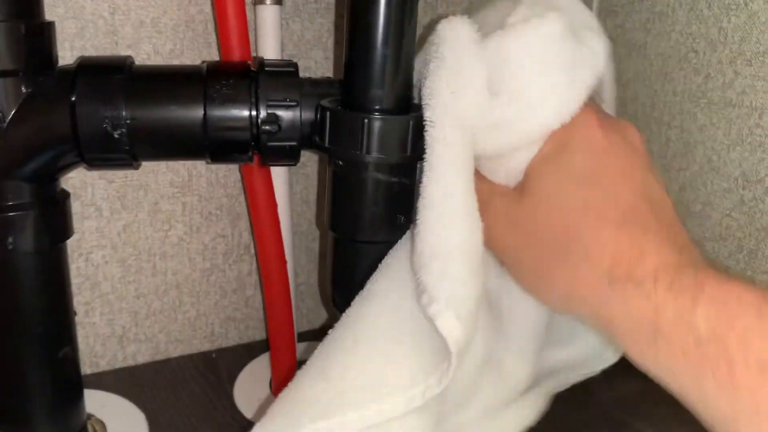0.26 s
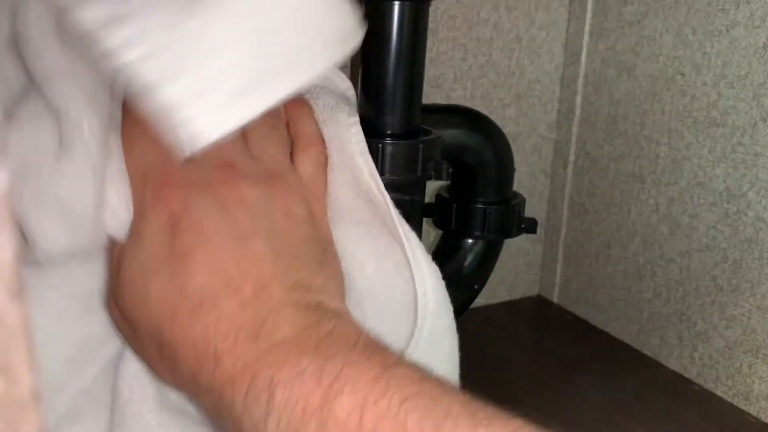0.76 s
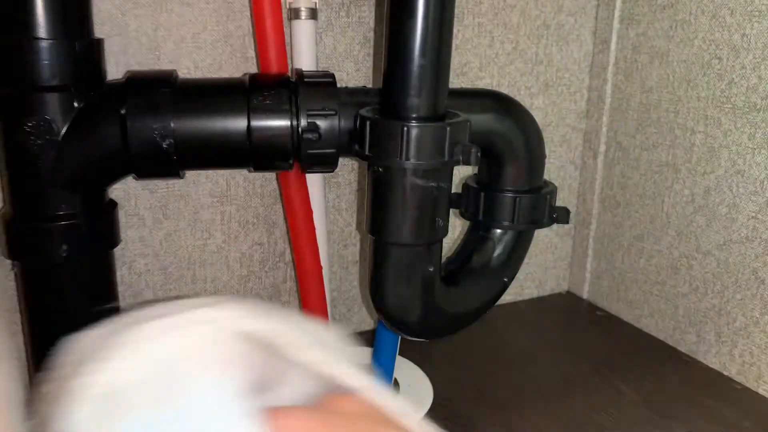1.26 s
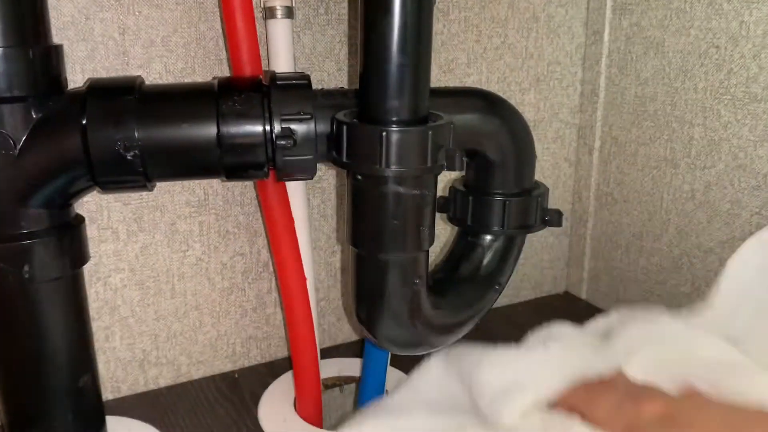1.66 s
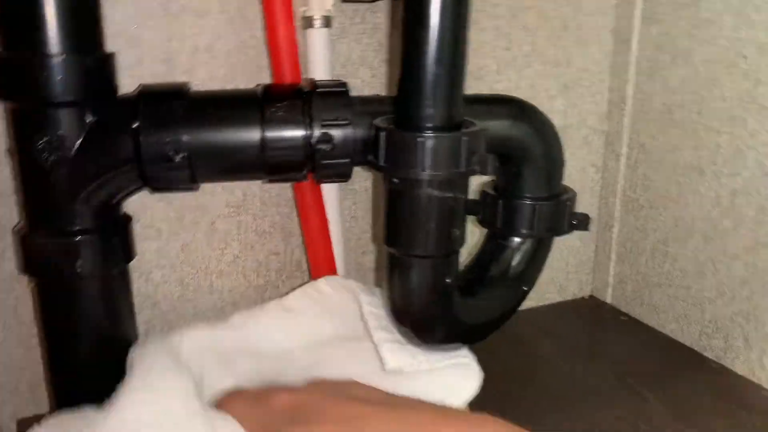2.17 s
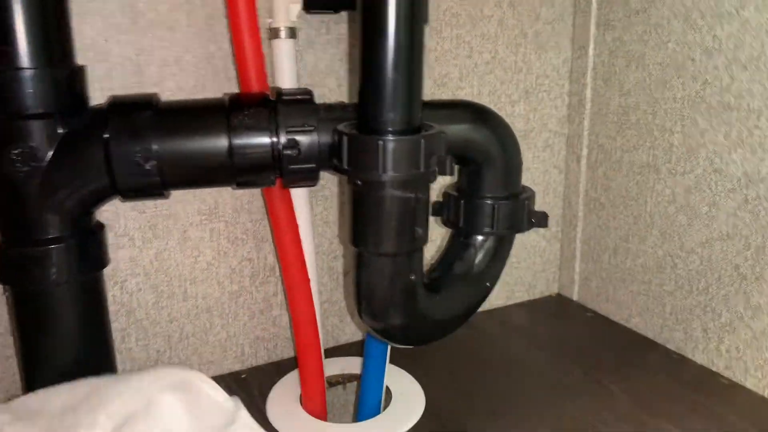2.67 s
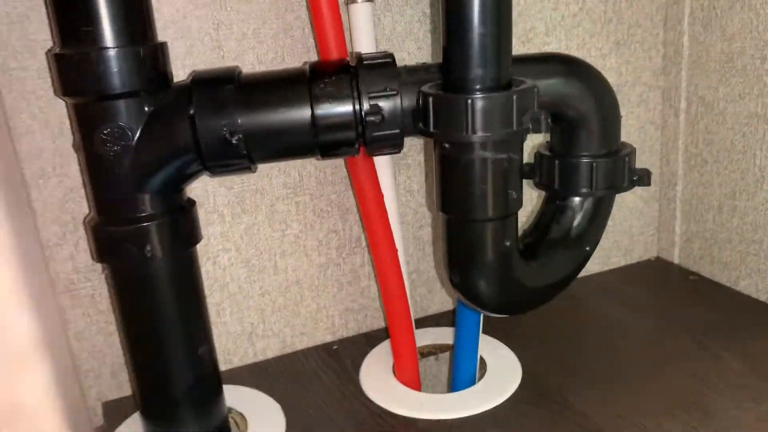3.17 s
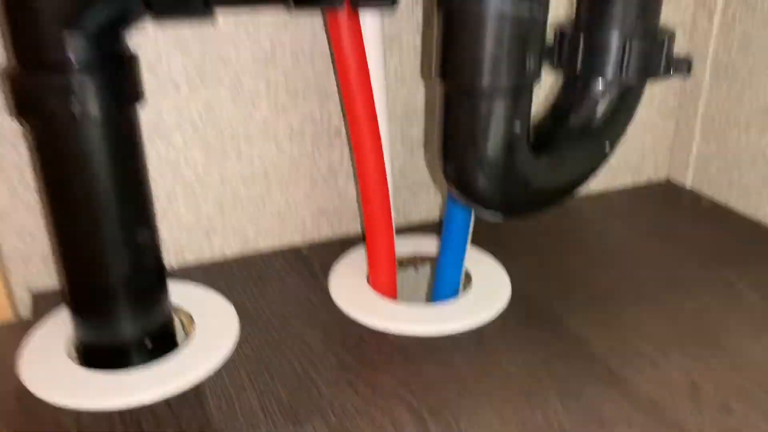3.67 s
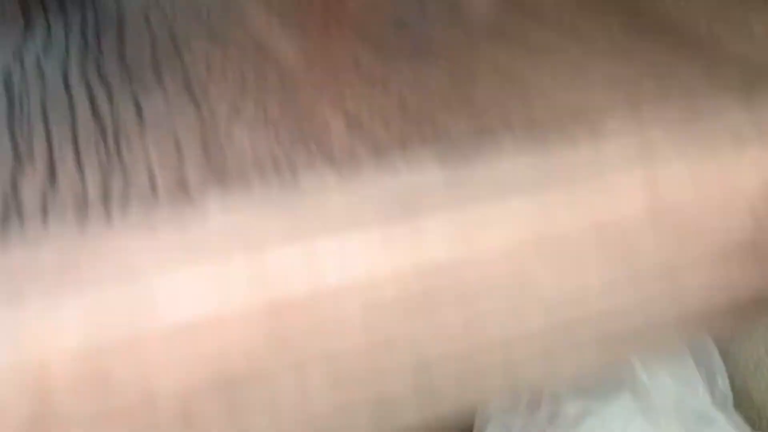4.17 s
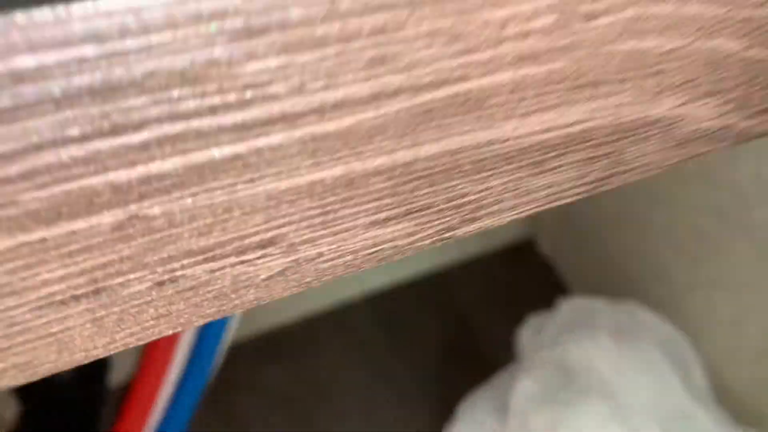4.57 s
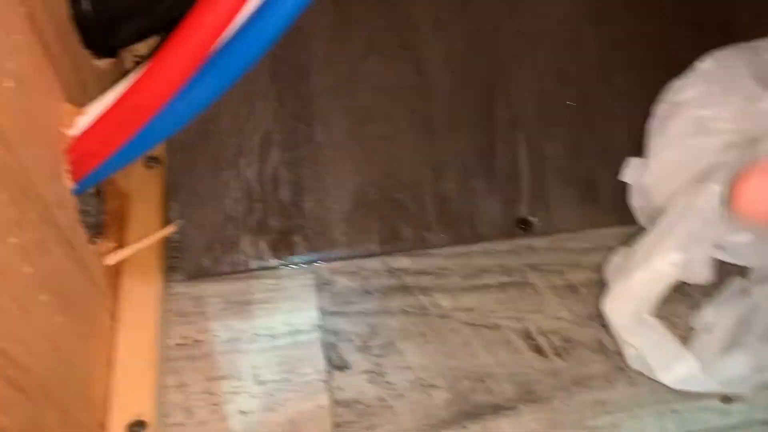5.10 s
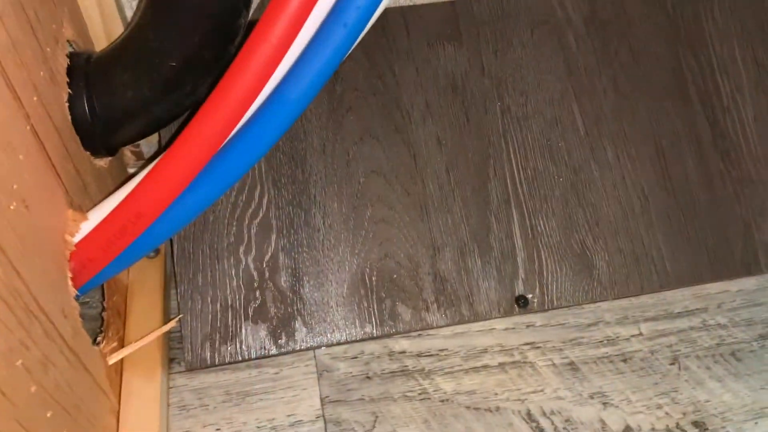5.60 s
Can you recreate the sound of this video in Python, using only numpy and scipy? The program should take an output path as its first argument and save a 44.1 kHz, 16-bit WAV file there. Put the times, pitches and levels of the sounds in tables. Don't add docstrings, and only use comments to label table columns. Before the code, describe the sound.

Inside a small wooden under-sink cabinet, a towel drags in short soft strokes while the hand bumps panels and plastic pipes with dull, hollow knocks. Strokes brighten toward three seconds. Near four seconds the handheld stereo microphone is swung round, with a graze, a loose clink and a very loud pop. It ends with close, fast, hissy wiping and small taps.

```python
import sys
import numpy as np
from scipy import signal
from scipy.fft import rfft, irfft, next_fast_len
from scipy.io import wavfile
from scipy.ndimage import uniform_filter1d

SR = 44100
rng = np.random.default_rng(int(sys.argv[2]) if len(sys.argv) > 2 else 0)


def undo_db(level):
    steps = np.asarray(level, float) / 20
    return 10 ** steps


def waveform_to_disk(signal):
    frames = np.transpose(np.atleast_2d(signal))
    scaled = np.clip(frames, -1, 1) * 32767
    samples = np.round(scaled).astype(np.int16)
    wavfile.write(sys.argv[1], SR, samples)


N = 257544
PADDED = next_fast_len(N + SR // 4)

# (start [s], length [s], speed as hiss level [dB], grip as scrape level [dB])
STROKES = [(-0.04, 0.19, -74.5, -70.5), (0.13, 0.21, -68.5, -68), (0.428, 0.26, -74, -71),
           (0.84, 0.49, -76.5, -75.5), (1.14, 0.18, -68.5, -66.5), (1.326, 0.28, -71, -73),
           (1.658, 0.16, -60.5, -62.5), (1.834, 0.24, -60.5, -63.5), (2.158, 0.2, -65, -60.5),
           (2.404, 0.21, -62.5, -61.5), (2.686, 0.15, -63, -63), (2.843, 0.25, -68, -68.5),
           (3.205, 0.13, -55.5, -59), (3.356, 0.15, -64, -68), (3.451, 0.17, -58, -64),
           (3.645, 0.044, -62, -73), (3.687, 0.053, -60.5, -69), (3.771, 0.076, -64, -87),
           (3.927, 0.024, -59.5, -84), (3.856, 0.092, -54, -80), (4.002, 0.11, -59, -96),
           (4.149, 0.13, -59.5, -75), (4.293, 0.19, -55.5, -64), (4.537, 0.11, -61.5, -65.5),
           (4.619, 0.12, -59, -63), (4.767, 0.094, -56, -57), (4.875, 0.16, -70, -76),
           (5.064, 0.091, -73.5, -66), (5.168, 0.071, -37, -62), (5.235, 0.073, -40.5, -54),
           (5.284, 0.051, -42.5, -51), (5.34, 0.089, -42.5, -56), (5.463, 0.22, -46.5, -55.5),
           (5.562, 0.081, -46.5, -47), (5.692, 0.087, -50.5, -55)]
ATTACK_S, SAG_DB_PER_S, RELEASE_DB_PER_S = 0.035, 9.5, 245
REST_HISS_DB, REST_SCRAPE_DB, REST_SWISH_DB = -83.5, -74, -86.5
# (time [s], level [dB])
LEAN = [(0.0, -55), (0.45, -54.5), (0.93, -57), (1.25, -54.5), (2.0, -55), (2.15, -55), (3.17, -59),
        (3.46, -55.5), (3.67, -57.5), (3.94, -63.5), (4.6, -56), (4.75, -52.5), (5.11, -56.5),
        (5.53, -54.5), (5.6, -46.5), (5.84, -50)]
# (start [s], length [s], level [dB])
HEM = [
    (0.03, 0.29, -75),
    (1.2, 0.17, -71),
    (1.36, 0.24, -69.5),
    (1.68, 0.088, -67),
    (2.83, .17, -68.5),
    (3.5, 0.12, -66),
    (4.35, 0.095, -67),
    (4.62, 0.21, -69.5),
    (5.33, 0.3, -55),
]
# (frequency [Hz], density [dB per Hz])
HISS = [(1500, -23), (3000, -1), (4500, 1), (7000, 3), (10000, 5), (14000, 3), (16500, 3.5)]
# (frequency [Hz], share [0-1])
LIKENESS = [(300, 0.97), (700, 0.85), (1100, 0.35), (1800, 0.7), (4000, 0.03), (12000, 0.04)]
ECHO_DB, WANDER_S = -4, 0.000301
FLECKS_PER_S, FLECK_DB, FLECK_WIDTH_HZ = 300, -8.5, 53

# (frequency [Hz], width [Hz], level [dB])
BOOM = [(86.3, 26.4, 0), (124, 24.3, 5), (159.2, 28.3, 1.5), (200.4, 61.5, 1), (259, 165, -4)]
PANELS = [(334, 59, 3), (387, 100, 2.5), (450, 310, -18.5), (536.3, 40, -3.5)]
THIN_PANELS = [(638.6, 59, -0.5), (707.4, 93, -1), (819, 53, -7), (997, 83, -13)]
PIPE = [(1080, 180, -1.5), (1245, 47, -5.5), (1420, 75, -1), (1589, 40, -8.5)]
CRACK_MODES = [(1985, 470, 10), (2150, 200, 10), (2476, 410, 10), (2570, 25, -26), (2975, 85, 5.5),
               (3280, 300, -0.5), (3700, 620, 9)]
SWISH = [(4170, 140, 2.1), (4630, 380, 12)]
FRAME = [(790, 77, 6), (1000, 74, 3.5)]
BOOM_DB, PANEL_DB, THIN_DB, PIPE_DB = 7, -62.5, -65, -70
PANEL_PER_LEAN, PANEL_PER_GRIP = 0.037, 0.77
THIN_PER_LEAN, THIN_PER_GRIP, PIPE_PER_GRIP = 0.088, 0.64, 1
NEAR_PANEL_DB, NEAR_THIN_DB = -6, -1.5
RUMBLE_DB = -69.5

# (time [s], peak [dB], ring [Hz], crack [dB], t60 [s])
TRAP_KNOCKS = [(0.113, -36.5, 450, -67, 0.03), (0.51, -31.5, 450, -41, 0.046),
               (1.076, -31, 387, -32.5, 0.073), (1.25, -48.5, 670, -47.5, 0.071),
               (1.644, -30, 486, -40, 0.055), (1.903, -44.5, 478, -46, 0.46), (1.927, -49, 630, -45, 0.03),
               (1.988, -43, 610, -44.5, 0.1), (2.056, -49, 615, -43, 0.079),
               (2.212, -37, 434, -37.5, 0.052), (2.466, -43.5, 487, -47.5, 0.081),
               (3.934, -35, 844, -37.5, 0.062), (3.954, -50, 325, -35.5, 0.014),
               (4.916, -41, 795, -39.5, 0.058), (5.181, -44.5, 996, -40.5, 0.3),
               (5.567, -41, 1030, -52, 0.08), (5.625, -35.5, 816, -42.5, 0.088),
               (5.687, -38.5, 1000, -38, 0.17)]
DRAIN_KNOCKS = [(1.034, -37, 420, -55, 0.066), (1.35, -50.5, 655, -51.5, 0.032),
                (2.915, -42.5, 377, -55.5, 0.072), (3.274, -34.5, 500, -35, 0.05),
                (3.325, -26, 670, -34, 0.076), (3.505, -43.5, 378, -49.5, 0.12),
                (3.563, -36.5, 730, -37.5, 0.1), (3.613, -41, 378, -45.5, 0.061),
                (3.894, -33.5, 660, -48, 0.048), (4.249, -44.5, 830, -52, 0.043),
                (4.368, -29, 703, -35, 0.039), (4.577, -41.5, 940, -44, 0.037),
                (4.674, -46.5, 864, -51, 0.083), (5.223, -60, 820, -38.5, 0.13)]
RIM_KNOCKS = [
    (0.582, -49, 604, -57.5, 0.075),
    (1.601, -42, 450, -49, 0.065),
    (1.144, -43, 700, -60, 0.1),
]
# (time [s], peak [dB], ring [Hz], t60 [s])
PADDED_KNOCKS = [(0.041, -43.5, 530, 0.052), (0.087, -41, 387, 0.03), (0.601, -47, 577, 0.37),
                 (0.749, -47.5, 378, 0.086), (1.205, -46, 450, 0.34), (1.416, -47, 388, 0.067),
                 (2.319, -37, 544, 0.082), (2.755, -48, 625, 0.11), (3.236, -48.5, 526, 0.1),
                 (4.297, -45, 660, 0.053), (4.62, -47, 873, 0.061), (4.842, -52, 1070, 0.067),
                 (5.411, -42.5, 820, 0.057), (5.739, -49, 1050, 0.091), (5.78, -29.5, 520, 0.04)]
TRAP_HZ, DRAIN_HZ, RIM_HZ = 1333, 1604, 2350
MUFFLED_DB, LEAD_IN_DB = -13, -18.5
OFF_PITCH_DB_PER_OCTAVE = 4.5
# (time [s], peak [dB], frequency [Hz], t60 [s])
BUMPS = [(0.045, -41.5, 168, 0.093), (0.517, -43, 124, 0.017), (0.655, -55, 143, 0.13),
         (1.029, -42.5, 152, 0.11), (1.074, -34.5, 184.5, 0.18), (1.207, -44, 162, 0.087),
         (1.644, -36, 141, 0.018), (2.056, -39, 180, 0.034), (2.918, -46, 135, 0.16),
         (3.279, -30, 190, 0.022), (3.326, -38.5, 170, 0.11), (3.566, -31, 244, 0.039),
         (4.371, -33.5, 172, 0.025), (4.712, -44.5, 101, 0.11), (4.76, -50, 164.5, 0.15),
         (5.415, -38, 124, 0.033), (5.552, -50, 115.6, 0.28), (5.785, -46, 200, 0.06)]
# (start [s], length [s], peak [dB], frequency [Hz])
CATCHES = [(0.102, 0.023, -47, 6400), (1.241, 0.042, -48, 2600), (1.325, .05, -54, 2070),
           (1.329, 0.062, -57.5, 6200), (1.34, 0.028, -57, 4770), (1.354, 0.018, -48, 1510),
           (2.315, 0.011, -46.5, 6800), (2.477, 0.044, -50.5, 2200), (2.694, .03, -54, 1300),
           (2.748, 0.063, -57, 2000), (2.801, 0.048, -50.5, 1310), (2.908, 0.021, -46, 1250),
           (0.105, .012, -57, 2100), (3.475, .015, -54, 10500), (3.49, .015, -54, 11500),
           (3.522, 0.021, -44, 1550), (3.529, 0.018, -47, 2900), (3.592, 0.042, -43, 3920),
           (3.607, 0.025, -47, 5000), (3.682, .022, -49, 3900), (3.697, .015, -50, 10500),
           (3.755, 0.014, -45, 12200), (3.759, 0.031, -52, 365), (3.794, .02, -56, 5200),
           (4.2, .02, -49, 7800), (4.65, .02, -56, 3500), (4.676, 0.032, -48.5, 1560),
           (4.708, 0.016, -48, 4300), (4.759, 0.013, -55, 3200), (4.79, 0.033, -50, 3900),
           (4.859, 0.013, -50, 800), (4.902, 0.011, -49, 3930), (5.201, 0.047, -38, 1370),
           (5.335, 0.057, -42.5, 795), (5.588, 0.067, -44, 1920), (5.645, .05, -46, 1890),
           (5.709, 0.014, -39, 1050), (5.75, 0.041, -42, 1000), (1.075, 0.017, -46.5, 4100),
           (2.206, 0.013, -42.5, 3880), (2.2, .015, -51, 5200), (3.263, 0.023, -50, 2750),
           (3.317, 0.02, -46, 3630), (4.395, .055, -50, 165), (4.895, 0.027, -41, 860),
           (4.398, 0.025, -45.5, 796), (5.37, .05, -43, 8000), (1.015, .025, -55, 2600),
           (0.576, 0.011, -56, 2270),
    (1.599, 0.011, -50.5, 3960),
    (1.6, .01, -57, 3070),
    (1.642, 0.0073, -47, 4100),
    (3.943, 0.023, -28, 1237),
    (3.947, .008, -36, 4500),
    (1.241, .04, -63, 1630),
]
CATCH_WIDTH = 0.11
# (time [s], peak [dB], t60 [s])
TICKS = [(0.1106, -46, 0.02), (0.474, -47, 0.026), (0.514, -42.5, 0.02), (1.075, -42.5, 0.019),
         (1.6427, -41, 0.016), (2.213, -42.5, 0.025), (2.3203, -47, 0.0086), (3.563, -38.5, 0.014),
         (3.605, -44, 0.068), (3.759, -41, 0.018), (4.575, -49, 0.017), (5.1787, -31.5, 0.028),
         (5.778, -36.5, 0.012)]
# (time [s], peak [dB], ring [Hz], t60 [s])
CLEAN_TAPS = [(0.575, -47, 490, 0.044), (0.599, -37.5, 513, 0.056), (0.618, -47, 649, 0.13),
              (0.636, -43.5, 516, 0.094), (0.649, -31, 145, 0.16), (0.75, -35, 390, 0.092),
              (1.028, -40, 470, 0.073), (1.0755, -30, 1404, 0.042), (1.076, -36, 2610, 0.04),
              (1.077, -41, 1910, 0.035), (1.081, -22.5, 400, 0.038), (1.08, -28.5, 617, 0.04),
              (1.087, -29.5, 647, 0.027), (1.105, -39.5, 600, 0.078), (1.602, -42.5, 2350, 0.032),
              (1.605, -39, 556, 0.036), (1.637, -24, 363, 0.082), (1.642, -35, 1310, 0.03),
              (1.647, -32.5, 586, 0.022), (2.211, -42, 1590, 0.021), (2.213, -31.5, 420, 0.1),
              (2.217, -37.5, 709, 0.059), (2.321, -31.5, 502, 0.034), (2.321, -34, 603, 0.12),
              (2.319, -47, 1255, 0.06), (2.321, -32.5, 400, .08), (2.212, -44.5, 2080, 0.047),
              (3.224, -42, 470, 0.044), (3.24, -38.5, 540, 0.058), (3.274, -32, 1480, 0.034),
              (3.276, -15.5, 490, 0.01), (3.282, -38, 533, 0.25), (3.278, -24, 337, 0.046),
              (3.331, -27.5, 392, .1), (3.327, -46, 2250, .045), (3.326, -22, 760, 0.009),
              (3.33, -22, 496, 0.045), (3.339, -32.5, 717, 0.034), (3.326, -38, 1610, 0.021),
              (4.367, -32.5, 1500, 0.064), (4.372, -22, 752, 0.038), (4.372, -38, 409, 0.12),
              (4.382, -26.5, 770, 0.024), (4.706, -32.5, 124, 0.084), (4.721, -31.5, 168, 0.095),
              (4.917, -31, 790, 0.042), (5.633, -32.5, 700, 0.043), (5.738, -33.5, 1037, 0.036),
              (5.781, -25, 505, 0.054),
              (0.511, -41, 1420, 0.047), (0.512, -42, 2120, 0.046), (1.602, -52, 1360, .03),
             (1.649, -26, 707, 0.013), (3.8895, -38, 1790, 0.12), (3.892, -40, 940, 0.12),
             (3.893, -30, 654, 0.043), (3.934, -31, 820, .04), (3.936, -37, 522, 0.069),
             (5.553, -30.5, 113.3, 0.19), (5.6296, -27.5, 960, 0.016), (5.45, -39.5, 123, .5),
             (5.781, -31.5, 237, 0.046)]
TAP_RISE_CYCLES = 0.39
# (start [s], length [s], level [dB])
DRAIN_RUBS = [
    (1.2, 0.56, -69),
    (2.85, 0.077, -59),
    (3.5, 0.12, -55),
    (3.56, 0.17, -63.5),
]
# (start [s], length [s], level [dB])
SCUFFS = [
    (4.6, .06, -64),
    (4.67, 0.11, -55),
    (4.8, 0.1, -50.5),
    (5.19, 0.065, -65),
    (5.57, 0.071, -48),
    (5.68, 0.12, -50),
    (5.79, 0.037, -61),
]
# (frequency [Hz], width [Hz], level [dB])
CLINK = [(2150, 240, -6), (2770, 220, -10), (3190, 260, -7), (5000, 510, -10), (5480, 77, -3)]
CLINK_S, CLINK_DB = 3.889, -31

# (frequency [Hz], left lead [rad], left-right [dB])
PORTS_BEFORE = [(40, 1.5, 0), (240, 3.0, 0), (370, 4.1, 0), (620, 5.9, 0), (760, 6.4, 0), (1100, 8.8, 0),
                (1450, 7.1, 0), (16000, 22, 0)]
PORTS_AFTER = [(40, 0.6, 15), (97, 0.23, -7), (267, 1.28, -6), (341, 3.88, -3), (670, 5.33, -2),
               (800, 7.4, -2), (1000, 7.4, -7.5), (1400, 3.86, 0.5), (2120, 9, -0.5), (17200, 21.3, -3)]
SWING_S = 3.885
POP_S, POP_LEFT_DB, POP_RIGHT_DB = 3.9612, 3.5, -2
DUCK_DB, RECOVER_S = -18, 0.061


def amp_one(x):
    return x / np.sqrt(np.mean(x ** 2) + 1e-20)


def top_one(x):
    return x / np.abs(x).max()


def add(out, s, sound):
    i = int(s * SR)
    out[:, i:i + sound.shape[-1]] += sound[..., :N - i]


def in_time(rows):
    s, *columns = np.transpose(rows)
    return [np.interp(np.arange(N) / SR, s, c) for c in columns]


def at_hz(points, hz):
    points_hz, values = np.transpose(points)
    return np.interp(np.log(hz), np.log(points_hz), values)


def drift(rate_hz):
    r = np.exp(-80 * np.pi * rate_hz / SR)
    slow = signal.lfilter([1], [1, -2 * r, r * r], rng.standard_normal(N // 40 + 2002))[2000:]
    return np.interp(np.arange(N) / 40, np.arange(len(slow)), amp_one(slow))


def resonate(x, hz, width_hz):
    r = np.exp(-np.pi * width_hz / SR)
    poles = [1, -2 * r * np.cos(2 * np.pi * hz / SR), r * r]
    return signal.lfilter([(1 - r * r) / 2, 0, (r * r - 1) / 2], poles, x)


def dull(x, hz):
    return signal.sosfilt(signal.butter(3, hz, fs=SR, output="sos"), x)


def thin(x, hz):
    return signal.sosfilt(signal.butter(3, hz, "high", fs=SR, output="sos"), x)


def pair(common, apart, alike):
    alike = np.clip(alike, 0, 1)
    return np.sqrt((1 + alike) / 2) * common + np.sqrt((1 - alike) / 2) * apart * [[1], [-1]]


def strokes(rows, rest_db):
    t = np.arange(0, N, 32) / SR
    power = undo_db(rest_db) ** 2
    for s, length_s, db in rows:
        loss_db = SAG_DB_PER_S * (t - s) + RELEASE_DB_PER_S * np.maximum(t - s - length_s, 0)
        power = power + (np.clip((t - s) / ATTACK_S, 0, 1) * undo_db(db - loss_db)) ** 2
    return np.interp(np.arange(N) / SR, t, 10 * np.log10(power))


def friction(grains_per_s, spread_db, grain_share):
    sizes = undo_db(spread_db * np.minimum(rng.exponential(1, (2, N)), 4)) * rng.choice([-1, 1], (2, N))
    grains = amp_one(sizes * (rng.random((2, N)) < grains_per_s / SR))
    share = np.clip(grain_share, 0, 1)
    return np.sqrt(1 - share) * rng.standard_normal((2, N)) + np.sqrt(share) * grains


def wood(modes, level_db, patchy_db, grains_per_s, lumps_per_s):
    out, lumps = 0, drift(lumps_per_s)
    draws = [friction(grains_per_s, 4.54, 0.53) for k in range(2)]
    for k, (hz, width_hz, db) in enumerate(modes):
        common, apart = resonate(resonate(draws[k % 2], hz, width_hz), hz, 3 * width_hz)
        gain = undo_db(db + patchy_db * (lumps + 0.88 * drift(3.7))) / np.sqrt(width_hz)
        out = out + gain * pair(common, apart, at_hz(LIKENESS, hz))
    return undo_db(level_db) * amp_one(out)


def cloth(level_db, grains_per_s, grain_share, patchy_db):
    out, together = 0, drift(25)
    edges_hz = 16300 / 2 ** np.arange(10 / 3, -.1, -1 / 3)
    draws = [friction(grains_per_s, 5.9, grain_share) for k in range(2)]
    lightness = np.clip((-53.5 - level_db) / 20, 0, 1)
    for k, (low, high) in enumerate(zip(edges_hz, edges_hz[1:])):
        band = signal.butter(2, [low, high], "band", fs=SR, output="sos")
        common, apart = signal.sosfilt(band, draws[k % 2])
        hz = np.sqrt(low * high)
        tilt_db = -4 * lightness * np.log2(hz / 9000)
        gain = undo_db(at_hz(HISS, hz) + tilt_db + patchy_db * (together + 0.57 * drift(20)))
        out = out + gain * pair(common, apart, at_hz(LIKENESS, hz))
    out = out - 0.35 * resonate(out, 11050, 1000)
    hand_near = np.arange(N) > 5.45 * SR
    out = out - 0.78 * hand_near * resonate(out, 3150, 450)
    out = signal.sosfilt(signal.cheby2(16, 40, 15950, fs=SR, output="sos"), out)
    return undo_db(level_db) * out / np.sqrt(uniform_filter1d(np.mean(out ** 2, axis=0), size=SR // 4))


def early_echoes(x):
    out, at = x.copy(), np.arange(N)
    for k, lag_s in enumerate(rng.uniform(.0015, .007, 8)):
        late = np.interp(at - SR * (lag_s + WANDER_S * drift(1.504)), at, x[k % 2])
        out[k % 2] += undo_db(ECHO_DB) * late * (-1) ** (k // 2)
    return out


def flecks(level_db):
    snaps = rng.random((2, N)) < FLECKS_PER_S / SR
    sizes = undo_db(4.1 * np.minimum(rng.exponential(1, (2, N)), 3)) * snaps
    dealt = rng.integers(0, 24, (2, N))
    rings = 0
    for k, hz in enumerate(np.linspace(2200, 15000, 24)):
        own = sizes * (dealt == k) + 1e-18
        rings = rings + resonate(resonate(own, hz, FLECK_WIDTH_HZ), hz, 3 * FLECK_WIDTH_HZ)
    return undo_db(level_db + FLECK_DB) * amp_one(rings)


def rumble():
    band = signal.butter(2, [25, 75], "band", fs=SR, output="sos")
    return undo_db(RUMBLE_DB + drift(3.0)) * amp_one(signal.sosfilt(band, rng.standard_normal(N)))


def knock_rows():
    rows = []
    for table, crack_hz in [(TRAP_KNOCKS, TRAP_HZ), (DRAIN_KNOCKS, DRAIN_HZ), (RIM_KNOCKS, RIM_HZ)]:
        rows += [(s, db, hz, crack_db, crack_hz, t60) for s, db, hz, crack_db, t60 in table]
    return rows + [(s, db, hz, db + MUFFLED_DB, TRAP_HZ, t60) for s, db, hz, t60 in PADDED_KNOCKS]


def knocks():
    out, t = np.zeros((2, N)), np.arange(SR // 5) / SR
    body, shell = BOOM[3:] + PANELS + THIN_PANELS, PIPE[1:] + CRACK_MODES
    rows = knock_rows()
    noise = rng.standard_normal((len(rows), 3, len(t)))
    strength_db = 3 * rng.standard_normal((len(rows), 20))
    first_push = np.exp(-((t - .0055) / 0.000087) ** 2)
    for (s, db, hz, crack_db, crack_hz, t60), rough, own_db in zip(rows, noise, strength_db):
        decay_s = max(t60, .015)
        contact = (1 - np.exp(-t / (0.00081 + 0.019 * t60))) * undo_db(-60 * t / decay_s) * rough
        soft, hard = dull(contact[:2], 1.224 * hz), dull(contact[1:], 2960)

        struck = top_one(resonate(soft[0], hz, max(69, 4.4 / decay_s)))
        others = 0
        for (f, w, g), o in zip(body, own_db):
            off_db = OFF_PITCH_DB_PER_OCTAVE * abs(np.log2(f / hz))
            others = others + undo_db(g + o - off_db) * resonate(soft[1], f, 0.42 * w)
        thud = 0.0075 / decay_s * top_one(resonate(first_push, 1.56 * hz, 460))
        ring = undo_db(db + 4.5) * top_one(struck + 1.07 * top_one(others) + thud)

        bright = 0
        for (f, w, _), o in zip(shell, own_db[10:]):
            bright = bright + undo_db(o - 18.5 * np.log2(f / 1500)) * resonate(hard, f, w)
        bright = top_one(bright) + 0.91 * top_one(resonate(hard, crack_hz, 61)) + 1.75 * top_one(hard)

        brush = resonate(rough[2, :SR // 40] * np.hanning(SR // 40), hz, 400)
        add(out, s - .02, undo_db(db + LEAD_IN_DB) * top_one(brush))
        add(out, s - .004, thin(ring, 0.3 * hz))
        add(out, s - .002, undo_db(crack_db + 3.5) * top_one(pair(*bright, 0.13)))
    return out


def bumps():
    out, t = np.zeros((2, N)), np.arange(SR // 4) / SR
    noise = rng.standard_normal((len(BUMPS), len(t)))
    for (s, db, hz, t60), rough in zip(BUMPS, noise):
        push = dull(rough * np.exp(-t / 0.019), 470)
        box = sum(undo_db(g - 10.0 * abs(np.log2(f / hz))) * resonate(push, f, w) for f, w, g in BOOM)
        swell = (1 - np.exp(-t / 0.0019)) * undo_db(-60 * t / max(t60, .02))
        tone = swell * np.sin(2 * np.pi * hz * t)
        boom = thin(top_one(tone) + 0.84 * top_one(box), 0.68 * hz)
        add(out, s - .005, undo_db(db + 10.5) * top_one(boom))
    return out


def catches():
    out, t = np.zeros((2, N)), np.arange(SR // 10) / SR
    rows = CATCHES
    noise = rng.standard_normal((len(rows), 2, len(t)))
    for (s, length_s, db, hz), rough in zip(rows, noise):
        swell = rough * np.sin(np.pi * np.clip(t / length_s, 0, 1))
        band = resonate(resonate(swell, hz, CATCH_WIDTH * hz), hz, 2 * CATCH_WIDTH * hz)
        add(out, s, undo_db(db) * top_one(pair(*band, at_hz(LIKENESS, hz))))
    return out


def ticks():
    out, t = np.zeros((2, N)), np.arange(SR // 10) / SR
    noise = rng.standard_normal((len(TICKS), 2, len(t)))
    for (s, db, t60), rough in zip(TICKS, noise):
        puff = (1 - np.exp(-t / 0.0029)) ** 2 * undo_db(-60 * t / max(1.4 * t60, .004))
        snap = resonate(rough * puff, 2900, 6200)
        add(out, s - .003, undo_db(db - 1.0) * top_one(pair(*dull(snap, 13000), 0.12)))
    return out


def taps():
    out, t = np.zeros((2, N)), np.arange(SR // 5) / SR
    for s, db, hz, t60 in CLEAN_TAPS:
        swell = (1 - np.exp(-t * hz / TAP_RISE_CYCLES)) * undo_db(-60 * t / max(t60, .01))
        add(out, s - 1 / hz, undo_db(db) * top_one(swell * np.sin(2 * np.pi * hz * t)))
    return out


def clink():
    out, t = np.zeros((2, N)), np.arange(SR // 5) / SR
    chatter = rng.standard_normal((2, len(t))) * np.exp(-t / 0.019)
    rings = sum(undo_db(g) * resonate(resonate(chatter, f, w), f, 3 * w) for f, w, g in CLINK)
    add(out, CLINK_S, undo_db(CLINK_DB) * top_one(rings))
    return out


def pop():
    t = np.arange(SR // 8) / SR
    step = (1 - np.exp(-t / .00009)) * np.exp(-t / 0.00014)
    step += 4.5 * resonate(step, 140, 120)
    step += 1.2 * resonate(step, 14000, 4000) - 0.7 * resonate(step, 8000, 4500)
    r = np.exp(-2 * np.pi * 900 / SR)
    far = signal.lfilter([1 - r], [1, -r], signal.lfilter([1 - r], [1, -r], step))
    out = np.zeros((2, N))
    add(out, POP_S, np.array([undo_db(POP_LEFT_DB) * step, undo_db(POP_RIGHT_DB) * far]))
    return out


def ports(x, table):
    hz, lead_rad, tilt_db = np.transpose(table)
    grid_hz = np.fft.rfftfreq(PADDED, 1 / SR)
    half = undo_db(np.interp(grid_hz, hz, tilt_db) / 2) * np.exp(.5j * np.interp(grid_hz, hz, lead_rad))
    return irfft(rfft(x, PADDED) * [half, 1 / half], PADDED)[:, :N]


def scene():
    t = np.arange(N) / SR
    since_pop_s = t - POP_S - .002
    duck_db = DUCK_DB * (since_pop_s > 0) * np.exp(-np.abs(since_pop_s) / RECOVER_S)
    hiss_db = strokes([r[:3] for r in STROKES], REST_HISS_DB) + duck_db
    grip_db = strokes([r[:2] + r[3:] for r in STROKES], REST_SCRAPE_DB) + duck_db
    turned = np.clip((t - SWING_S) / 0.073, 0, 1)
    lean_db, = in_time(LEAN)
    lean, grip = lean_db - lean_db.mean(), grip_db + 68

    panel_db = PANEL_DB + NEAR_PANEL_DB * turned + PANEL_PER_LEAN * lean + PANEL_PER_GRIP * grip
    thin_db = THIN_DB + NEAR_THIN_DB * turned + THIN_PER_LEAN * lean + THIN_PER_GRIP * grip
    box = wood(BOOM, BOOM_DB + lean_db, 1.52, 250, 20.0)
    box += wood(PANELS, panel_db, 2.9, 250, 32)
    box += wood(THIN_PANELS, thin_db, 2.0, 330, 58)
    fibres = wood(CRACK_MODES, grip_db, 3.1, 800, 62)
    fibres += wood(SWISH, strokes(HEM, REST_SWISH_DB), 0.96, 1800, 7.3)
    fibres += wood(PIPE, PIPE_DB + PIPE_PER_GRIP * grip, 3.8, 450, 33)
    box -= 0.47 * (1 - turned) * resonate(box + fibres, 1130, 265)

    air = box + fibres + early_echoes(cloth(hiss_db - 2.0, 3000, 0.54, 1.63))
    air += knocks() + bumps() + ticks() + taps() + clink()
    air += wood([(DRAIN_HZ, 60, 0), (1760, 60, -5)], strokes(DRAIN_RUBS, -78.5), 2.6, 400, 30)
    air += wood(FRAME, strokes(SCUFFS, -95), 1.8, 400, 28)
    no_bass = signal.butter(2, 88, "high", fs=SR, output="sos")
    air = signal.sosfilt(no_bass, air) + rumble()
    air += flecks(hiss_db) + catches()
    return ports(air * (1 - turned), PORTS_BEFORE) + ports(air * turned, PORTS_AFTER) + pop()


def low_pass(x):
    return signal.sosfilt(signal.butter(12, 15850, fs=SR, output="sos"), x)


def record(dry):
    grid_hz = np.fft.rfftfreq(PADDED, 1 / SR)
    ladder = np.exp(-6.7j * np.log(np.clip(grid_hz, 30, 9000) / 9000))
    ladder *= grid_hz ** 2 / (grid_hz ** 2 + 45 ** 2)
    mix = irfft(rfft(dry, PADDED) * ladder, PADDED)[:, :N]
    return low_pass(mix)


dry = scene()
out = record(dry)
waveform_to_disk(out)
```